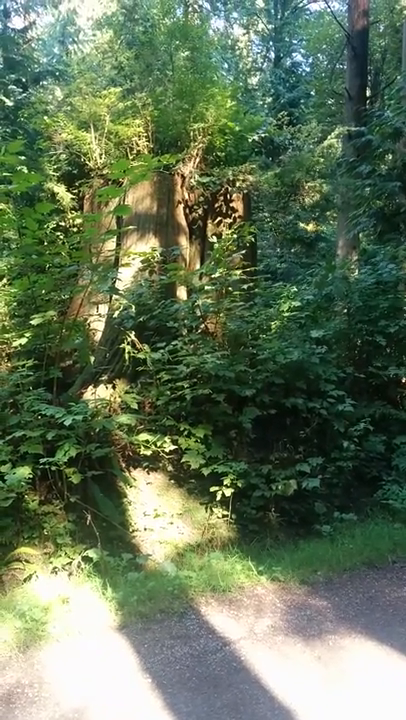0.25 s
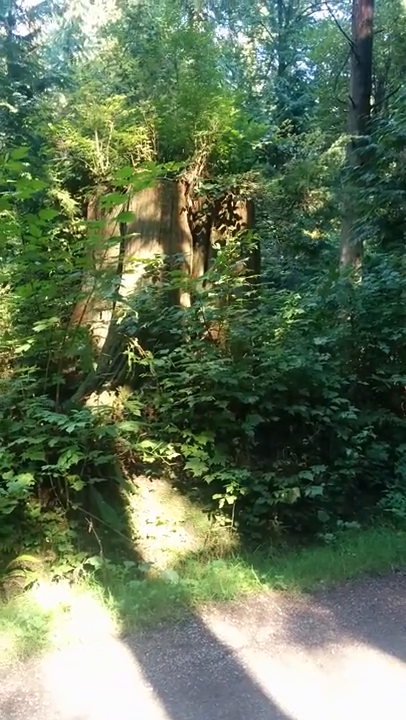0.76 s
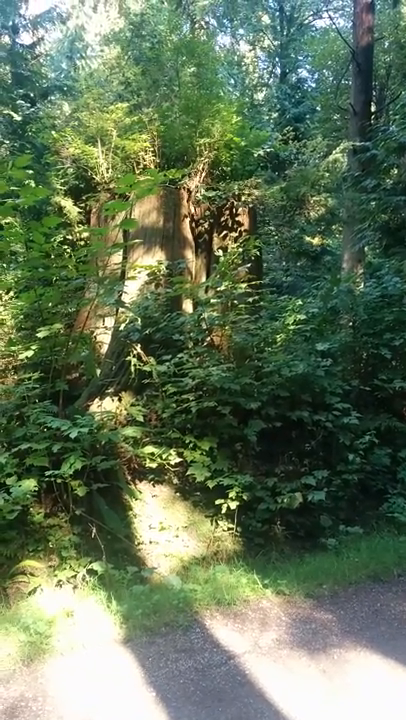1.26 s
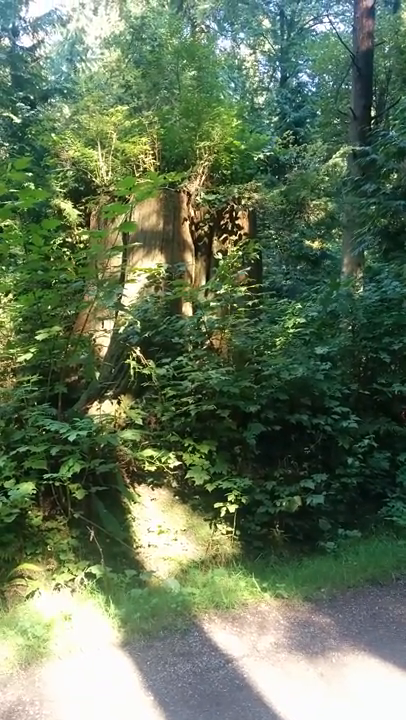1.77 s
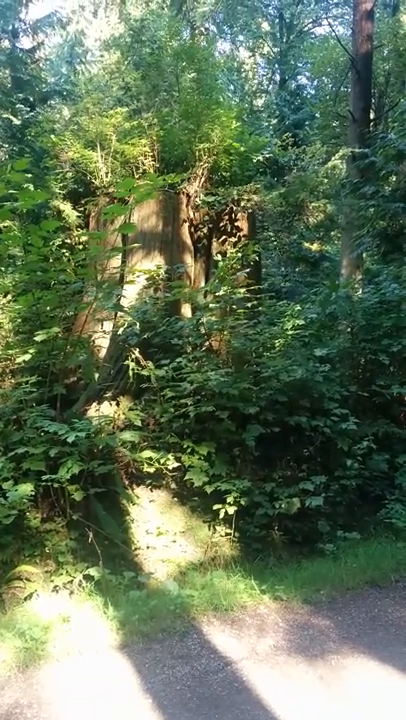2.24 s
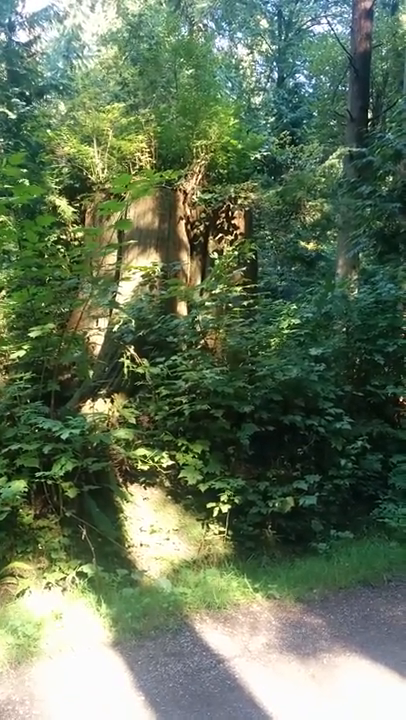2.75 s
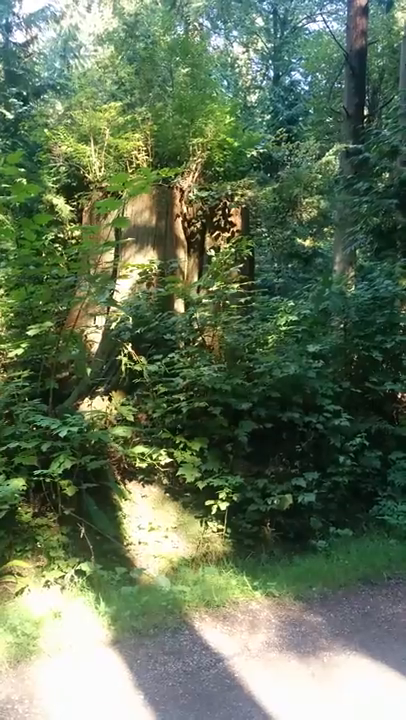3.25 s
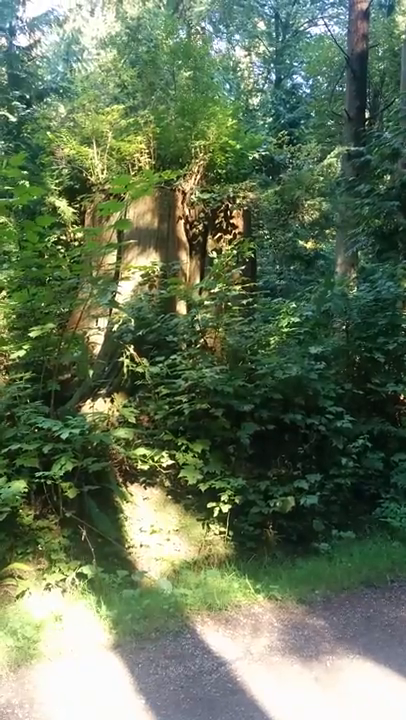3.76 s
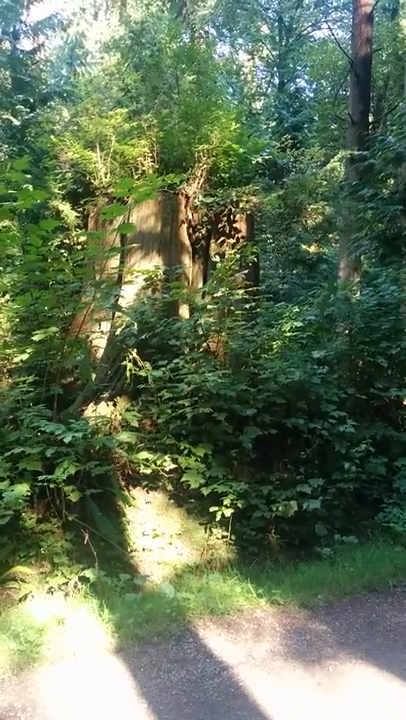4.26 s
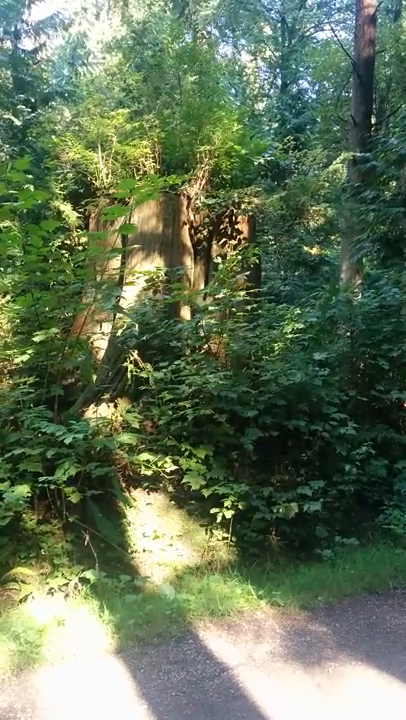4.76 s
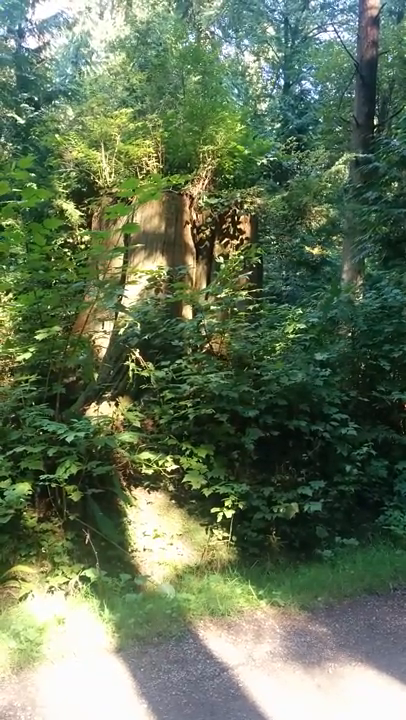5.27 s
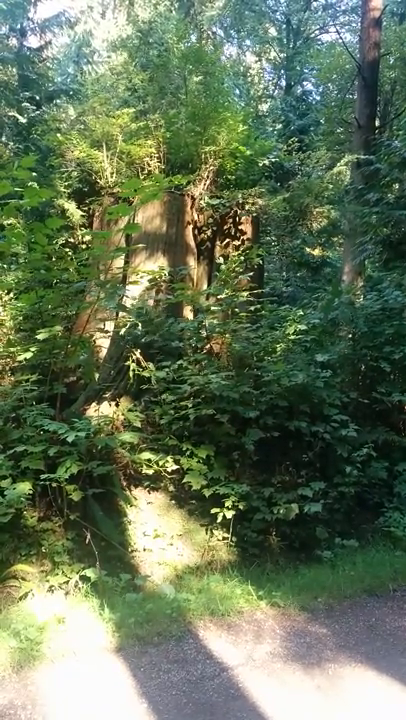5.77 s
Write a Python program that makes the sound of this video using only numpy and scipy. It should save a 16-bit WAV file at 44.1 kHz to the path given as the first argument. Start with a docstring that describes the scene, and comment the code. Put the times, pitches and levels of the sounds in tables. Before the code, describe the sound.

A mono hand-held recording in leafy woodland, with a faint low hum of distant traffic and soft air noise. A dull bump opens it, and until about 1.3 s a far squirrel trills softly in short sliding notes. A near squirrel calls loudly at 0.2 s, then three quick chirps at 0.7-0.9 s, singles at 1.2, 1.6 and 2.0 s, and another quick three at 2.5-2.7 s. Each is under a tenth of a second, bright, arched and piercing, with a short diffuse forest echo. From 3.3 s the calls are lower and hoarser: barks at 3.3, 3.8, 4.0, 4.2, 4.4 and 4.6 s, then raspier ones with longer breathy tails at 5.0 and 5.5 s. Faint rasps and a brief leaf rustle follow around 5.6-5.7 s. Soft low handling thumps recur throughout, with a muffled case rub near 1-1.5 s, until the end at 6 s.

```python
"""A low bump and a faint far squirrel's note open over the hum of distant traffic; then a near squirrel calls.
Its arched chirps, overtone stacks through a throat, turn into hoarse barks of growl and breath noise.
The far one trills softly in short gliding notes; trunks and foliage scatter the calls as decaying noise echoes.
The hand-held microphone adds low swings that swell and fade and one short rub, noise ringing in its case.
Faint rasps and a leaf rustle, shaped noise, follow the last bark over a rumble and banded air noise."""
import sys
import numpy as np
from scipy import signal
from scipy.io import wavfile

SR = 44100
rng = np.random.default_rng(int(sys.argv[2]) if len(sys.argv) > 2 else 0)


def master_out(mix):
    """Clip the mix to full scale and print it as 16-bit PCM to the path in sys.argv[1]."""
    frames = np.transpose(np.atleast_2d(mix))
    ceiling = np.clip(frames, -1, 1)
    pcm = np.round(ceiling * 32767).astype(np.int16)
    wavfile.write(sys.argv[1], SR, pcm)


N = 265036

# The throat and mouth as a filter on the overtones: (frequency [Hz], gain [dB])
THROAT_RESPONSE = [(1500, -31), (2100, -9), (2700, 5.5), (3400, 5), (4300, -3), (5300, 4.5), (6100, -11.5),
                   (7200, 2), (8300, 0), (9000, -5), (10300, 7), (11500, -12.5), (12700, 0), (13700, -20),
                   (16000, -24.5)]
# Strength of overtones 1 to 6 as the folds make them: (level [dB])
FOLD_OVERTONES = [0, 3, 1, 5.5, -2.5, -5]
# Resonances of the hoarse growl: (centre [Hz], width [Hz], relative level [dB])
GROWL_MODES = [(1190, 400, -11), (2840, 590, 12.5), (3594, 400, 17)]
# Resonances of the breath: (centre [Hz], width [Hz], relative level [dB])
BREATH_MODES = [(812, 230, 4), (4680, 180, 2), (6730, 1300, -0.5), (9460, 600, 1), (11750, 1000, -13.5),
                (11700, 4800, -5), (16100, 670, -17.5)]
# A band drops out for three barks; the end values hold outside: (time [s], share taken away [0-1])
BAND_LOSS = [(4.1, 0.13), (4.15, 1), (4.75, 1), (4.9, 0.084)]
LOST_BAND_HZ, LOST_WIDTH_HZ = 5350, 1100
BREATH_LUMPS_DB = 4.5


def near_squirrel(shake=0.022, threshold_db=-54, warble_hz=3350, warble=0.2, warble_db=-2):
    """A stack of overtones through the throat, plus growl and breath where the folds lose their rhythm."""
    pitch, bright_db, whistle_gain, growl_gain, breath_gain, _, quaver = near_controls()

    # a growl shakes the pitch
    growl_share = np.minimum(growl_gain / (whistle_gain + 1e-9), 1)
    unrest = quaver + shake * growl_share
    phase = 2 * np.pi * np.cumsum(pitch * (1 + unrest * drift(200))) / SR

    # brightness shifts strength from the two low overtones to the upper ones
    orders = np.arange(1, 7)[:, None]
    tilt_db = bright_db * np.where(orders > 2, .5, -.5)
    gains = amp(at_hz(THROAT_RESPONSE, orders * pitch) + np.c_[FOLD_OVERTONES] + tilt_db)
    gains /= np.sqrt(np.sum(gains ** 2, axis=0) / 2)

    # a quavering call also breaks up in level
    flutter_db = 2.2 + 70 * quaver
    flutter = amp(flutter_db * np.array([drift(110) for _ in orders]))
    stack = np.sum(gains * flutter * np.sin(orders * phase), axis=0)

    # the folds need some pressure to start
    speaking = whistle_gain ** 2 / (whistle_gain ** 2 + amp(threshold_db) ** 2)
    whistle = speaking * whistle_gain * stack

    # while the folds speak, much of the breath pulses with them and gathers round the overtones
    fringe = .7 * speaking
    breath = fringe * stack * drift(210) + np.sqrt(1 - fringe ** 2) * resonant_noise(BREATH_MODES)

    # irregular folds puff the air out in lumps
    throb = rms_one(amp(3.2 * np.tanh(drift(150))))
    warble_pitch = warble_hz * (1 + warble * np.tanh(drift(110)))
    warbling = np.sin(2 * np.pi * np.cumsum(warble_pitch) / SR)
    growl = rms_one(resonant_noise(GROWL_MODES) + amp(warble_db) * warbling)
    breath_lumps = rms_one(amp(BREATH_LUMPS_DB * np.tanh(drift(44))))
    hoarse = throb * (growl_gain * growl + breath_gain * breath_lumps * breath)

    voice = whistle + hoarse
    peak_filter = signal.iirpeak(LOST_BAND_HZ, LOST_BAND_HZ / LOST_WIDTH_HZ, SR)
    band = signal.lfilter(*peak_filter, voice + 1e-18)
    return voice - np.clip(in_time(BAND_LOSS)[0], 0, 1) * band


# The near squirrel, one row a call: (time [s], hold on first pitch [s], mid-call swell [dB], attack [s],
# lateness of pitch drop [power], quaver [share of pitch], whistle length [s], hoarse tail [s],
# first pitch [Hz], top pitch [Hz], last pitch [Hz], pitch rise [s], whistle first level [dB],
# whistle last level [dB], first brightness [dB], last brightness [dB], growl level [dB],
# breath level [dB], chest level [dB]); the rules below shape these levels further
NEAR_CALLS = [ (0.236, 0.0013, 0, .013, 5.7, .008, .068, 0.0113, 2063, 2762, 1900, 0.0036, -34.5, -41.5, -7, 3.5, -63.5, -44, -63),
              (0.714, 0.00091, 0, .011, 7.4, .005, 0.06, 0.022, 2202, 2809, 2000, 0.0036, -33, -39.5, -16, 4.5, -54.5, -42.5, -70.5),
              (0.793, 0.00071, 0, .011, 8.2, .008, .049, 0.013, 1983, 2706, 2030, .005, -36, -38.5, 1.5, -0.5, -59, -44, -65),
              (0.874, .002, 1, 0.013, 9.0, 0.0062, .050, .014, 2025, 2609, 2154, .004, -34.5, -41, 4, 0, -63, -44.5, -74),
              (1.228, .001, -1, 0.00865, 3.9, .008, 0.074, 0.019, 2054, 2737, 2010, 0.0078, -37.5, -39, 4, 3.5, -55.5, -45, -79),
              (1.603, .001, -5.5, 0.012, 4.58, .008, 0.06, 0.031, 1640, 2675, 1614, 0.0052, -30, -33.5, 5, 9, -52, -46.5, -73.5),
              (2.048, .001, -0.5, 0.01, 4, .008, 0.067, 0.018, 1715, 2656, 1663, 0.0048, -36, -40, -4, 2.5, -53.5, -43, -64),
              (2.513, 0.0012, -0.5, .008, 1.4, .017, 0.11, 0.012, 2064, 2634, 2360, .004, -34.5, -35, -9.5, 6, -51, -44, -69),
              (2.634, 0.00091, -4, 0.013, 11, 0.0069, .050, .014, 1966, 2646, 1803, 0.0085, -26.5, -37.5, 7.5, 3.5, -63, -41.5, -65),
              (2.714, .002, -5.5, 0.013, 7.0, 0.0057, .053, 0.019, 1575, 2560, 1750, 0.0059, -26, -41.5, 11.5, 5, -59, -44, -72),
              (3.272, 0.0067, 5, 0.016, 2.6, .02, 0.058, 0.04045, 1570, 2325, 2175, .002, -32, -44, 0, -3.5, -41.5, -43.5, -56.5),
              (3.767, 0.0036, 1, 0.012, 4.37, .022, 0.053, 0.041, 1605, 2432, 1592, 0.0053, -32, -38.5, 5.5, -1.5, -43, -41, -59),
              (3.976, 0.0054, 0.5, 0.0098, 4.9, .014, .052, 0.0482, 1510, 2380, 2060, .003, -35.5, -38.5, 2.5, -0.5, -40, -43, -64.5),
              (4.179, 0.0043, 2.5, 0.019, 4.93, .02, 0.046, 0.03, 1550, 2227, 2007, 0.0051, -33, -41.5, 8, 1.5, -52, -42.5, -61),
              (4.394, 0.006, -0.5, 0.012, 6.1, .02, 0.041, 0.024, 1450, 2245, 1828, 0.0042, -34, -38, 8, 2.5, -49.5, -45.5, -60),
              (4.643, .005, 3, 0.022, 5.2, .02, 0.043, 0.029, 1450, 2238, 1967, 0.0034, -30, -40.5, 10.5, -3, -49.5, -40, -65.5),
              (4.995, 0.0053, 1, 0.011, 3.76, .016, 0.048, 0.13, 1500, 2187, 1976, 0.0039, -39, -35.5, -2, -1, -40.5, -44.5, -51.5),
              (5.507, 0.0072, -2, 0.0089, 3.8, .05, .052, 0.068, 1500, 2090, 1560, 0.012, -32.5, -40.5, 2.5, -0.5, -38, -42.5, -51),
              ]
RELEASE_S = 0.004  # of the whistle
BRIGHT_PER_DB, LOW_DULL_DB = 1.04, -9.5  # louder is brighter; the low start is dull
TAIL_SAG_DB, TAIL_FADE_DB, TAIL_POWER = -7, -18.5, 2.1  # how the hoarse tail dies
# the growl barks at the onset, sinks under the whistle and returns as the pitch drops
ONSET_GROWL_DB, ONSET_S, UNDER_WHISTLE_DB, GROWL_POWER = 2, .008, -9, 6.6
# the breath is held back while the whistle sounds and fades sooner than the growl
BREATH_UNDER_DB, BREATH_TAIL_DB = -1.5, -3
CHEST_SWELL_DB = -17  # the chest swells to the end


def near_controls():
    """Pitch, brightness, gains of whistle, growl, breath and chest, and quaver, from rules all calls share."""
    t, out = np.arange(N) / SR, np.zeros((7, N))
    out[0] = 2000  # resting pitch between calls, Hz
    for (s, hold, swell_db, attack_s, drop, quaver, length, tail,
         from_hz, top_hz, end_hz, rise, in_db, out_db, bright_in, bright_out,
         growl_db, breath_db, chest_db) in NEAR_CALLS:
        inside = (t >= s) & (t < s + length + 1.3 * tail)
        age = t[inside] - s
        u = np.minimum(age / length, 1)  # progress through the whistle
        late = np.maximum(age - length, 0)  # time into the hoarse tail

        attack = np.sin(np.pi / 2 * np.minimum(age / attack_s, 1)) ** 2
        tail_db = TAIL_SAG_DB * late / tail + TAIL_FADE_DB * (late / tail) ** TAIL_POWER
        dying = attack * amp(tail_db)
        low = np.exp(-np.maximum(age - hold, 0) / rise)
        swell = swell_db * np.sin(np.pi * u)

        pitch = top_hz - (top_hz - from_hz) * low - (top_hz - end_hz) * u ** drop
        bright_db = bright_in + (bright_out - bright_in) * u + BRIGHT_PER_DB * swell + LOW_DULL_DB * low
        release = np.exp(-(late / RELEASE_S) ** 2)
        whistle = attack * amp(in_db + (out_db - in_db) * u + swell) * release
        bark = amp(ONSET_GROWL_DB) * np.exp(-(age / ONSET_S) ** 2)
        growl = dying * amp(growl_db) * (amp(UNDER_WHISTLE_DB * (1 - u ** GROWL_POWER)) + bark)
        held_db = BREATH_UNDER_DB * (0.5 - u ** GROWL_POWER)
        breath = dying * amp(breath_db + held_db + BREATH_TAIL_DB * late / tail)
        chest_gain = dying * amp(chest_db + CHEST_SWELL_DB * (0.5 - u))
        out[:, inside] = [pitch, bright_db, whistle, growl, breath, chest_gain, quaver + 0 * age]
    return out


# Resonances of the near squirrel's chest: (centre [Hz], width [Hz], relative level [dB])
CHEST_RESONANCES = [(896, 160, -0.5), (1046, 200, -1)]


def chest():
    """A low lumpy rumble in the resonance of the chest."""
    lumpy = amp(2.5 * drift(90)) * resonant_noise(CHEST_RESONANCES)
    return near_controls()[5] * rms_one(lumpy)


# Faint rasps after the last bark: (time [s], envelope peak [dB], length [s])
RASP_PUFFS = [(5.6364, -53.5, 0.0073), (5.68, -52.5, 0.0038), (5.717, -67, 0.0082)]


def rasps(breath_db=-8):
    """Brief hoarse puffs of growl and breath noise without a whistle."""
    t = np.arange(N) / SR
    envelope = sum(amp(db) * np.exp(-((t - s - length) / length) ** 2) for s, db, length in RASP_PUFFS)
    return envelope * (resonant_noise(GROWL_MODES) + amp(breath_db) * resonant_noise(BREATH_MODES))


# The far squirrel, one row a note: (time [s], envelope peak [dB], pitch before glides [Hz], length [s])
FAR_NOTES = [(0.051, -62, 2030, 0.056), (0.263, -43, 2045, 0.0453), (0.342, -41, 2080, 0.046),
             (0.414, -43, 2045, 0.049), (0.484, -42.5, 2052, 0.042), (0.561, -45.5, 2050, 0.0483),
             (0.641, -46.5, 2043, 0.05), (0.728, -39, 2050, 0.058), (0.828, -41.5, 2042, 0.05),
             (0.927, -43.5, 2050, 0.038), (1.0571, -47, 2043, 0.046), (1.21, -43.5, 2216, 0.069)]
# Strength of its overtones from the first up: (relative level [dB])
FAR_OVERTONES = [-4, 1, -13, -27, -34]
# Resonances of its breath: (centre [Hz], width [Hz], relative level [dB])
FAR_BREATH_MODES = [(1000, 800, 0), (2000, 300, 0), (4000, 500, 4), (6000, 500, -6), (8300, 900, -8),
                    (9900, 900, -7)]


def far_squirrel(arch=.14, sag=.09, wobble=0.027, breath_db=-16, swell=1.34, lean=1.08):
    """Short notes that slide up to a level pitch and sag at the end, with a puff of breath."""
    envelope, pitch, t = np.zeros(N), np.full(N, 2000.), np.arange(N) / SR
    for s, peak_db, hz, length in FAR_NOTES:
        inside = (t > s) & (t < s + length)
        u = (t[inside] - s) / length
        envelope[inside] += amp(peak_db) * np.sin(np.pi * u ** lean) ** swell
        pitch[inside] = hz * (1 - arch * np.exp(-u / 0.2) - sag * u ** 3)
    phase = 2 * np.pi * np.cumsum(pitch * (1 + wobble * drift(130))) / SR

    # each overtone flickers by itself
    flicker_db = 3.5
    tones = 0
    for k, db in enumerate(FAR_OVERTONES):
        tones = tones + amp(db + flicker_db * drift(80)) * np.sin((k + 1) * phase)
    direct = envelope * (rms_one(tones) / 2 + amp(breath_db) * resonant_noise(FAR_BREATH_MODES))

    # on the long way many trunks add their echoes and roughen the notes
    lag = np.arange(SR // 5) / SR
    echoes = rng.standard_normal(len(lag)) * amp(-33 - 60 * lag / .12)
    return direct + signal.fftconvolve(direct, echoes)[:N]


ECHO_T60_S, ECHO_DB = .05, -9
LATE_T60_S, LATE_DB = 0.39, -27


def forest(x):
    """Near trunks give a quick smear; moving foliage deep in the wood a long, blurred and faint tail."""
    t = np.arange(SR) / SR
    noise = rng.standard_normal((2, SR)) * np.sqrt(2 * np.log(1000) / SR)
    smear = amp(ECHO_DB - 60 * t / ECHO_T60_S) / np.sqrt(ECHO_T60_S) * noise[0]
    build_up = np.minimum(t / 0.017, 1)
    tail = amp(LATE_DB - 60 * t / LATE_T60_S) / np.sqrt(LATE_T60_S) * build_up * noise[1]
    # shivering leaves spread each tone into a band
    spread_hz = 600
    blurred = x * drift(spread_hz)
    return x + signal.fftconvolve(x, smear)[:N] + signal.fftconvolve(blurred, tail)[:N]


RUSTLE_S, RUSTLE_DB, RUSTLE_FADE_DB_PER_S = 5.63, -59.5, -62


def leaf_rustle():
    """Leaves rustle after the last bark: lumpy noise in two resonances that rises quickly and fades."""
    age = np.arange(N) / SR - RUSTLE_S
    envelope = np.clip(age / .03, 0, 1) * amp(RUSTLE_DB + RUSTLE_FADE_DB_PER_S * np.maximum(age, 0))
    lumpy = amp(2 * drift(52)) * resonant_noise([(2666, 546, 5.5), (8150, 4300, -6.5)])
    return envelope * rms_one(lumpy)


# The louder bumps of the hand on the microphone case: (time [s], swing level [dB], pitch [Hz])
LOUD_BUMPS = [(0.038, -49.5, 82.8), (0.434, -54.5, 364), (0.91, -53.5, 280), (0.971, -53.5, 296),
              (1.011, -48, 79), (1.681, -49.5, 381.6), (2.169, -50, 107.2), (2.218, -50.5, 96.7),
              (2.341, -51, 173), (2.377, -55, 155), (2.549, -51, 229.6), (2.574, -49.5, 99.06),
              (2.624, -47.5, 100.7), (2.771, -53, 75.3), (2.811, -51.5, 266), (2.866, -50.5, 74.5),
              (2.971, -50, 102.6), (4.005, -46, 95.32), (4.044, -47.5, 355.5), (4.528, -54.5, 247),
              (4.7, -47.5, 100.3), (4.848, -49, 81.3), (5.189, -54, 104.9), (5.368, -53.5, 94.7),
              (5.395, -47.5, 84.6), (5.517, -46, 87.4), (5.688, -48, 248.5), (5.843, -57, 336),
              (5.988, -51.5, 96)]
# The rub of the case: (time [s], level [dB])
CASE_RUB = [(0.94, -75), (0.96, -56), (1.2, -49), (1.26, -50), (1.31, -51.5), (1.46, -52.5), (1.49, -80)]
# Resonances of the rubbed case: (centre [Hz], width [Hz], relative level [dB])
CASE_MODES = [(95, 94, -12.5), (269, 24, 0), (358.3, 41, -10)]


def handling(turns=0.52, settle_s=0.00919, scuff_db=-8, scuff_hz=500):
    """Each bump is a low swing with a dull scuff; the rub is lumpy noise in the resonances of the case."""
    out, span = np.zeros(N), np.arange(-2000, 2000)
    t = span / SR
    dull = signal.butter(2, scuff_hz, fs=SR, output="sos")
    scuff = rms_one(signal.sosfilt(dull, rng.standard_normal(N)))
    bumps = [*LOUD_BUMPS, *faint_bumps()]
    start_phases = rng.uniform(0, 2 * np.pi, len(bumps))
    for (s, db, hz), start in zip(bumps, start_phases):
        at = np.clip(round(s * SR) + span, 0, N - 1)
        swing = np.sin(2 * np.pi * hz * t + start) + amp(scuff_db) * scuff[at]
        # swells and fades evenly about its time; lower bumps last longer
        envelope = np.exp(-(t / (settle_s + turns / hz / 2)) ** 2)
        out[at] += amp(db) * envelope * swing
    rub = rms_one(amp(drift(38)) * resonant_noise(CASE_MODES))
    return out + sounding(CASE_RUB) * rub


FAINT_BUMP_DB, FAINT_LOW_HZ, FAINT_HIGH_HZ = -58, 75.2, 410  # mean level and range of pitch


def faint_bumps(count=30):
    """Rows like the loud bumps, at random times, levels and pitches."""
    when, size, tone = rng.random((count, 3)).T
    pitch = FAINT_LOW_HZ * (FAINT_HIGH_HZ / FAINT_LOW_HZ) ** tone
    return np.c_[when * N / SR, FAINT_BUMP_DB + 6 * (size - .5), pitch]


# The swell of the rumble: (time [s], level [dB])
RUMBLE_SWELL = [(0, -62), (.6, -65.5), (1.17, -65.5), (1.25, -53), (1.44, -76.5), (2.2, -59), (2.8, -69),
                (3.6, -70), (4.2, -62.5), (6.01, -65)]


def rumble():
    """A lumpy low noise that swells and sinks."""
    lumpy = amp(4 * drift(12))
    lumps = lumpy * resonant_noise([(74.0, 66, -5.5), (248.0, 66, -11.5), (380, 140, -13)])
    return amp(in_time(RUMBLE_SWELL)[0]) * rms_one(lumps)


# Spectrum of distant traffic and air: (frequency [Hz], relative level per Hz [dB])
AIR_SPECTRUM = [(25, -28), (50, 2), (100, -15), (200, -14), (320, -7.5), (520, -18.5), (800, 4), (1000, -7),
                (1250, -30.5), (1600, -19.5), (2600, -24), (4200, -36), (9000, -30.5), (13000, -37),
                (17000, -35.5)]
AIR_DB = -66  # rms of the whole


def air(patchy_db=1.3, swell_db=1.3):
    """Half-octave bands of noise; the hum below 1.5 kHz wavers band by band and swells as one."""
    out, edges, white = 0, 25 * 2 ** np.arange(0, 9.6, .5), rng.standard_normal((2, N))
    swell = swell_db * drift(8)
    for k, (low, high) in enumerate(zip(edges, edges[1:])):
        band_filter = signal.butter(2, [low, min(high, .45 * SR)], "band", fs=SR, output="sos")
        band = signal.sosfilt(band_filter, white[k % 2])
        waver_db = (patchy_db * drift(4.3) + swell) * (low < 1500)
        out = out + amp(at_hz(AIR_SPECTRUM, np.sqrt(low * high)) + waver_db) * band
    return amp(AIR_DB) * rms_one(out)


def amp(db):
    """Decibels to gain."""
    return 10 ** (np.asarray(db) / 20)


def rms_one(x):
    """Scale to unit rms."""
    return x / np.sqrt(np.mean(x ** 2) + 1e-20)


def in_time(rows):
    """Columns of a table, joined by straight lines, at every sample."""
    s, *columns = np.transpose(rows)
    return [np.interp(np.arange(N) / SR, s, c) for c in columns]


def sounding(rows):
    """Gain of a (time [s], level [dB]) curve, ramped to -110 dB on either side."""
    before, after = (rows[0][0] - .02, -110), (rows[-1][0] + .02, -110)
    return amp(in_time([before, *rows, after])[0])


def at_hz(points, hz):
    """A spectrum read on a log-frequency axis."""
    table_hz, table_db = np.array(points)[:, 0], np.array(points)[:, 1]
    return np.interp(np.log(hz), np.log(table_hz), table_db)


def drift(rate):
    """Smooth random curve of unit rms: white noise through a two-pole low-pass at rate [Hz]."""
    r = np.exp(-2 * np.pi * rate / SR)
    white = rng.standard_normal(N + SR)
    return rms_one(signal.lfilter([1], [1, -2 * r, r * r], white)[SR:])  # drop the first second to settle


def resonant_noise(modes):
    """White noise twice through each resonance, so the valleys stay dark; rms 1."""
    out, white = 0, rng.standard_normal(N)
    for k, (hz, width_hz, level_db) in enumerate(modes):
        r = np.exp(-np.pi * 1.5 * width_hz / SR)  # widened, as two passes narrow the peak
        section = [1, 0, -1, 1, -2 * r * np.cos(2 * np.pi * hz / SR), r * r]
        ringing = rms_one(signal.sosfilt([section] * 2, white))
        out = out + (-1) ** k * amp(level_db) * np.sqrt(width_hz) * ringing
    return rms_one(out)


def scene():
    """Calls in the forest over rustle, handling and background."""
    calls = forest(near_squirrel() + chest() + far_squirrel() + rasps())
    return (calls + leaf_rustle() + handling() + rumble() + air())[None]


def record(dry):
    """A steep low-pass cuts the top, 70 dB down from 16.75 kHz."""
    return signal.sosfilt(signal.cheby2(12, 70, 16750, fs=SR, output="sos"), dry)


dry = scene()
out = record(dry)
master_out(out)
```